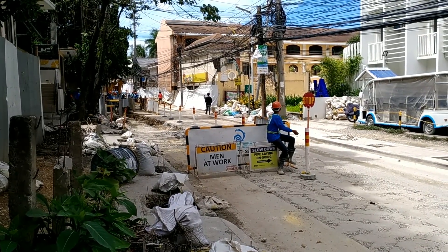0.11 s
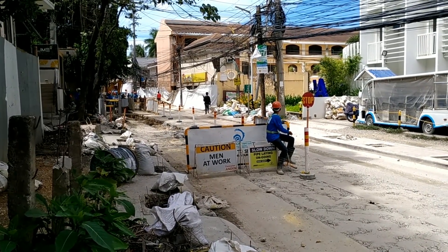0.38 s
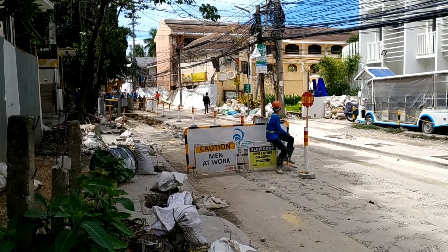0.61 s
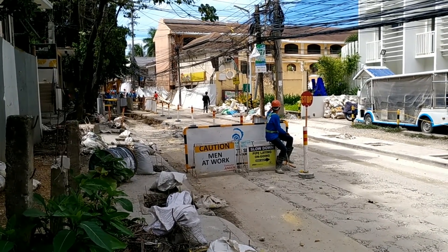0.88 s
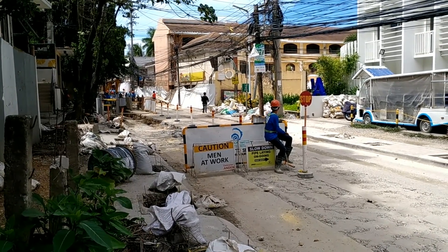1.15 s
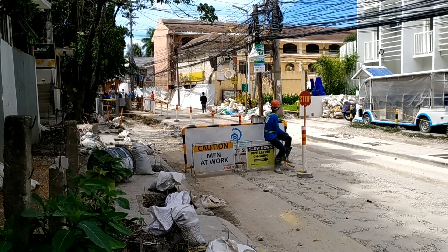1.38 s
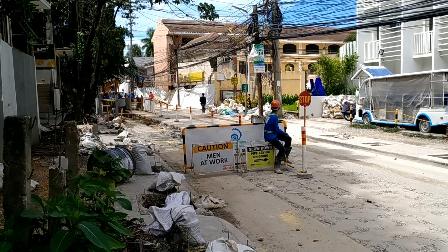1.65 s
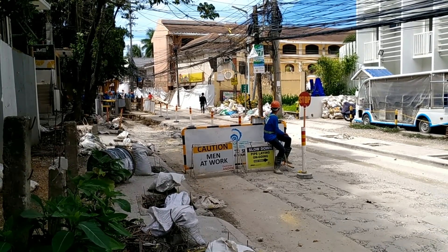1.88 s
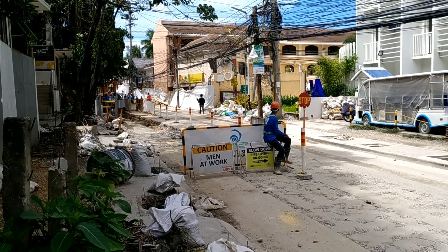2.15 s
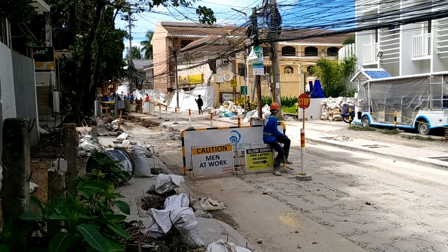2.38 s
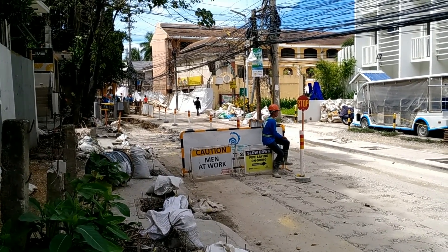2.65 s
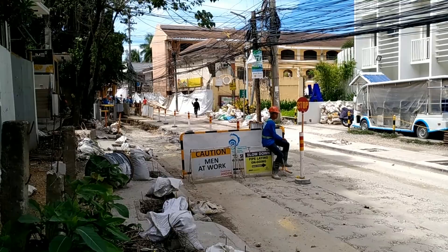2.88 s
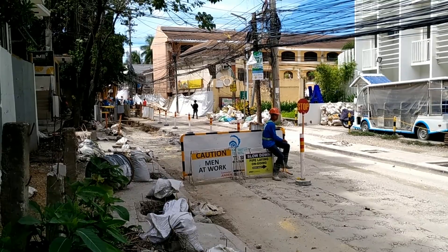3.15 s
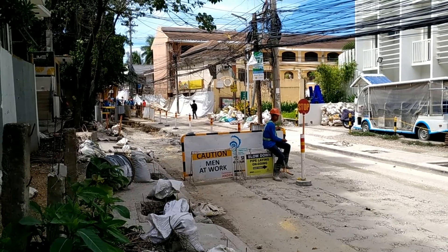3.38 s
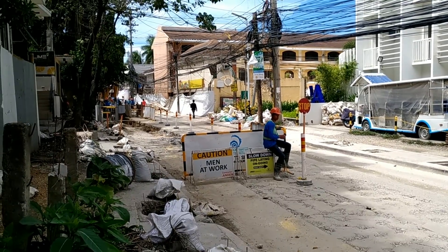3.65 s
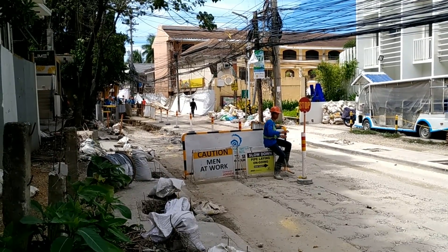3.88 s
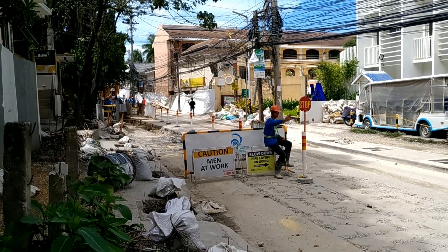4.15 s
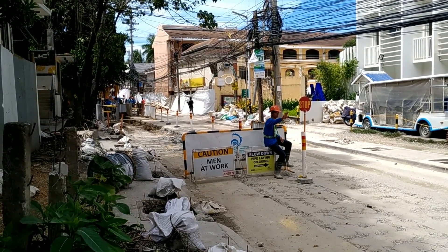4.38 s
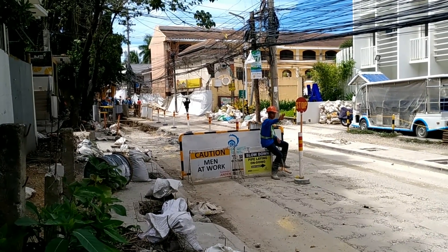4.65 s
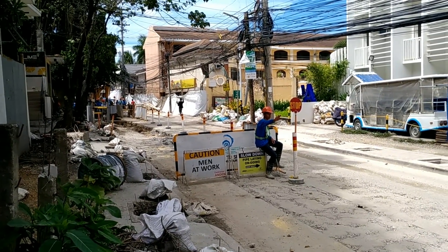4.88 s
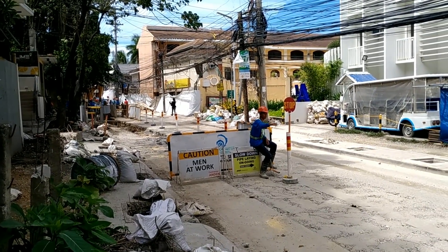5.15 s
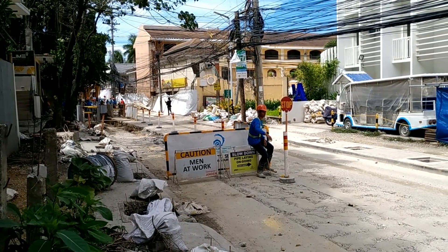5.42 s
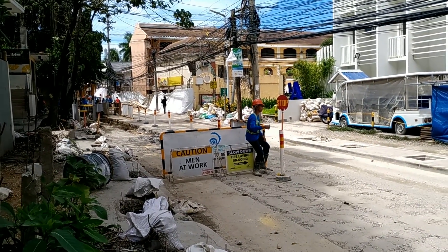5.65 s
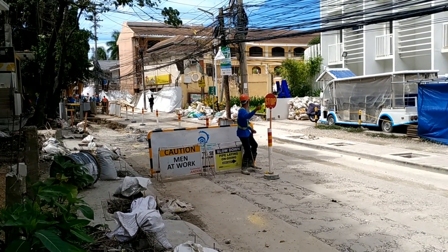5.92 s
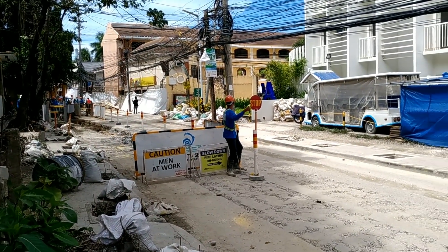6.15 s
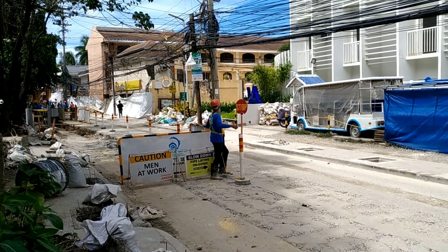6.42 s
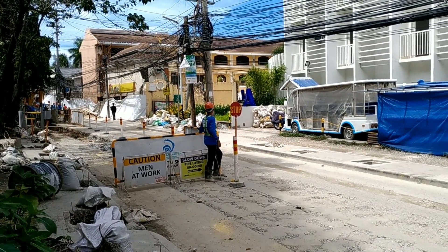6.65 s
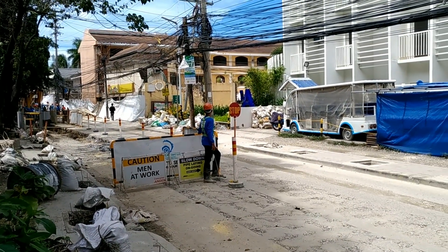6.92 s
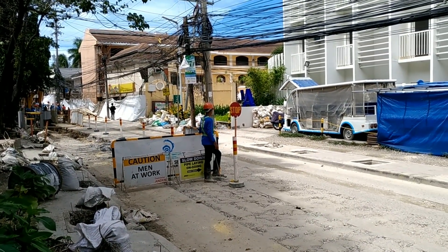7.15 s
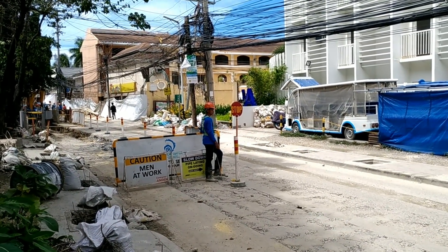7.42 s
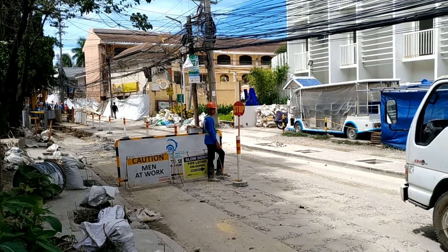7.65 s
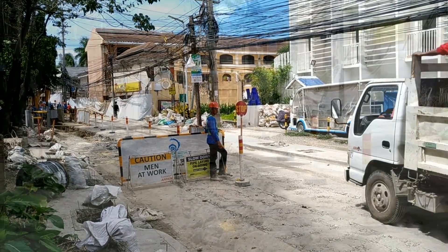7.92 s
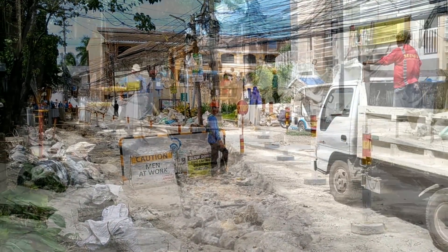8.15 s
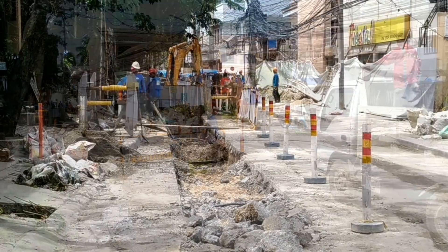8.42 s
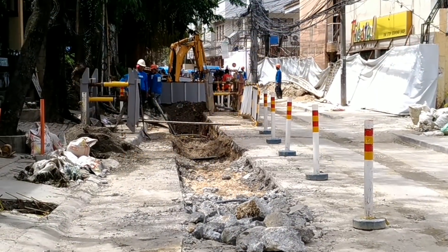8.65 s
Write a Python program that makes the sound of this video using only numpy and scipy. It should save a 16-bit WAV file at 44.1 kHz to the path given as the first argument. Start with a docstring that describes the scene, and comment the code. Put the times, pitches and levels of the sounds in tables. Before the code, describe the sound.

Outdoors beside street works, far engines rumble, a machine drones and tyres wash softly. Thin high squeals, squeaks, air puffs and small metal clinks come and go. A small diesel truck revs up from about four seconds, drops in pitch at a gear change, then clatters past about two metres from a two-port microphone. The sound cuts to silence, and a tiny scrap of street noise with wind thumps ends it.

```python
"""Truck pulling away through street works

Beside a dusty street under repair: far engines rumble, a site machine drones and tyres wash (banded noise).
A small diesel truck revs up, changes gear and rolls by on the right, about two metres from a two-port
microphone: sines at its firing orders, with noise for roar, clatter, block ring and hiss.
Gliding sines squeal, shaped noise puffs air and short decaying sines clink.
The sound drops out; its last tenth of a second is another stretch of the works, truckless, with wind thumps."""
import sys
import numpy as np
from scipy import signal
from scipy.fft import rfft, irfft, next_fast_len
from scipy.io import wavfile
from scipy.ndimage import uniform_filter1d

SR = 44100
rng = np.random.default_rng(int(sys.argv[2]) if len(sys.argv) > 2 else 0)


def generate_wav(signal):
    """Clip the signal to [-1, 1] and save it as 16-bit WAV at the path in sys.argv[1]."""
    frames = np.transpose(np.atleast_2d(signal))
    scaled = np.clip(frames, -1, 1) * 32767
    pcm = np.round(scaled).astype(np.int16)
    wavfile.write(sys.argv[1], SR, pcm)


N = 387638

# truck engine in each gear: (time [s], firing rate [1/s], tone level before the order offsets [dB])
FIRST_GEAR = [(3.7, 28.7, -51.5), (4.3, 37.3, -40), (4.6, 43.7, -38.5), (5.0, 53.3, -37), (5.2, 56, -35),
              (5.5, 63.5, -34.5), (5.75, 68, -36), (5.9, 69, -31.5), (6.0, 65.44, -31.5), (6.2, 58.3, -40),
              (6.4, 49.9, -36.5), (6.55, 40.5, -40), (6.62, 52, -53)]
SECOND_GEAR = [(6.62, 34.14, -47), (6.8, 37.5, -38.5), (7.0, 37.58, -36), (7.2, 40.42, -34.5),
               (7.6, 41.5, -35), (7.8, 43.33, -31), (8.04, 44, -35.5)]
# multiples of the firing rate that sound: (order)
FIRING_ORDERS = 1, 2, 3, 4, 6, 8, 10
# offsets, a row per order: (first gear [dB], second gear [dB], gain at full throttle [dB])
ORDER_OFFSETS = [(-3.3, -2, 4.5), (8.5, 1, -8), (-1.5, 1, 5.5), (-3, -5, -1), (-7.5, -8.5, 9.5),
                 (-8.5, -5, -1.4), (-7, -5, -0.4)]
# colour of the exhaust pipe: (frequency [Hz], gain [dB])
EXHAUST_PIPE = [(28, -27), (42, -4.2), (58, 5.5), (75, 3.5), (100, 5), (117, 0), (131, 5), (155, 0.3),
                (185, 2), (230, -7.5), (300, -4), (400, 2), (600, -1)]
MUFFLER_HZ = 467

# load on the truck: (time [s], exhaust roar level [dB], throttle [0-1])
TRUCK_LOAD = [(3.05, -66.5, .6), (3.45, -46.5, 0.16), (4.34, -35.5, 0.57), (5.0, -28.5, 0.35),
              (5.14, -29, 0.8), (5.42, -27, 1), (5.7, -24.5, 0.77), (5.8, -25, .99), (5.9, -25.5, 0.83),
              (5.98, -23.5, 0.12), (6.3, -27, 0.12), (6.5, -29, .05), (6.65, -32.5, 0.5),
              (6.97, -31.5, 0.61), (7.35, -28.5, 0.71), (7.7, -29.5, 0.72), (7.95, -32.5, 0.91),
              (8.04, -33.5, 0.86)]
# relative noise spectra of the truck: (frequency [Hz], density [dB per Hz])
ROAR_SPECTRUM = [(24, -32), (40, -19), (118, -5.5), (208, 2), (269, -5), (353, -2), (709, -9.5),
                 (997, -8.5), (1200, -17.5), (1560, -48), (2640, -120)]
CLATTER_SPECTRUM = [(500, -28), (800, -9), (1050, -6.5), (1400, 2.5), (1800, -2.5), (2300, -4), (3100, -20),
                    (4500, -26.5), (6000, -52.5)]
CLOSE_SPECTRUM = [(500, -31), (750, -10.5), (1300, 2.5), (1800, 1), (2400, -2), (3000, -9.5), (3600, -14.5),
                  (5500, -15.5), (7500, -25.5)]   # clatter heard straight from the truck
HISS_SPECTRUM = [(1900, -24), (3200, -3), (4600, -6.5), (6000, -9), (8000, -10.5), (10000, -12),
                 (12000, -19.5), (14200, -19.5)]
# against the roar: (level with the throttle shut [dB], gain at full throttle [dB])
CLATTER_DB, RING_DB, HISS_DB = (-12, 13), (-19, 13), (-15.5, 5)
BLOCK_RING_HZ, BLOCK_RING_WIDTH_HZ = 2662, 375
# the truck comes into view and rolls past
IN_VIEW_S, ABREAST_S, ABREAST_DB, ABREAST_M = 6.05, 7.63, -29.5, 2.1
TRUCK_M_PER_S = 5.5
RING_TURN_S, RING_TURN_DB, HISS_TURN_DB = 7.5, 4.5, 1.5   # the block faces us, then the tyres do
SCATTERED_LOSS_DB = 2   # scattered clatter gives way to the direct path once the truck is in view

# thin squeals that hold and squeaks that die away:
# (start [s], length [s], first frequency [Hz], last frequency [Hz], starting level [dB])
SQUEALS = [(0, 0.32, 6590, 6650, -52), (0.32, 0.28, 6620, 6600, -50.5), (0.999, 0.37, 6420, 6580, -56.5),
           (1.425, 0.34, 6600, 6550, -52), (1.78, .4, 6650, 6650, -53.5), (3.6, 0.72, 1003, 1010, -49.5),
           (7.701, 0.29, 10300, 10300, -54)]
SQUEAKS = [(.64, .4, 10255, 10240, -41), (1.49, .08, 8500, 8460, -44), (1.72, .08, 8370, 8300, -52),
           (1.9, .22, 7960, 7900, -53), (3.87, .15, 11230, 11260, -49), (4.1, .7, 10320, 10330, -54)]
SQUEAL_EDGE_S, SQUEAK_FADE_DB = .012, 16.5
SQUEAL_LEFT_DB = -4.5   # left port against right, at the source

# puffs of compressed air: (peak time [s], peak level [dB], fall to 1/e [s], low edge [Hz], high edge [Hz])
PUFFS = [(1.06, -44.5, 0.15, 900, 5100), (2.95, -37, .11, 300, 14200), (4.76, -42, 0.0498, 521, 8800)]
PUFF_RISE_S = 0.027
# soft swells of hiss: (peak time [s], peak level [dB], rise and fall to 1/e [s], low edge [Hz], high edge [Hz])
SWELLS = [(.61, -45.5, 0.063, 9200, 11400), (0.594, -45.5, 0.08, 620, 6200), (0.6, -52, 0.19, 5750, 6350),
          (1.85, -47.5, 0.051, 520, 1900), (7.4, -44.5, 0.18, 5100, 7250), (7.73, -39.5, .04, 5200, 8500),
          (8.0, -43.5, .05, 5000, 8500), (.02, -45, 0.022, 5100, 11000)]

# small metal clinks: (time [s], starting peak [dB], frequency [Hz], time to fall 60 dB [s])
CLINKS = [(1.14, -44, 8240, .08), (1.65, -51, 7000, .06), (1.925, -43, 3700, .07), (6.65, -38, 5500, .1),
          (7.08, -41, 5600, .1), (7.32, -38, 5500, .1), (7.77, -38, 6400, .07), (6.755, -48, 10990, .02)]

# the street swells and sinks: (time [s], level [dB])
STREET_SWELL = [(0, 0), (.5, 0), (.62, 3), (.76, 0.85), (1.55, 1.5), (1.9, 2.5), (2.1, 1.7), (2.88, 0),
                (2.98, 3.5), (3.34, -1), (3.85, 0.6), (4.3, 1.65)]
# relative noise spectra of the street: (frequency [Hz], density [dB per Hz])
RUMBLE_SPECTRUM = [(15, -58.5), (25, -30), (36, -27), (52, -4.5), (80, 0), (120, 1), (160, -5.5),
                   (200, -8.5), (400, -15), (700, -23), (1000, -41)]
DRONE_SPECTRUM = [(170, -28), (220, -5.5), (280, -1), (340, -4), (420, -18.5), (600, -27)]
WASH_SPECTRUM = [(240, -35), (450, -2), (700, -4.5), (1000, -3.5), (1700, -6.5), (2600, -8), (3100, -15.5),
                 (4800, -18.5), (6900, -20), (10000, -25.5), (12000, -33.5), (14200, -42.5)]
# ahead of the drop-out: (level without swell [dB], share of the swell)
RUMBLE_DB, DRONE_DB, WASH_DB = (-33, 0.7), (-40.5, 1.5), (-39, 1)
# on the second stretch: (rumble level [dB], drone level [dB], wash level [dB])
SECOND_STRETCH_DB = -33, -40.5, -36
GUST_DB, GUST_TOP_HZ = [[-26.5], [-35]], 130.2   # left, then right port

# noise common to the two microphone ports: (frequency [Hz], share of power [0-1])
PORT_SHARED = [(60, .94), (170, .96), (350, .92), (520, .8), (700, .63), (1300, .3), (1750, .5),
               (2100, .47), (2600, .27), (3600, .06), (14000, .05)]
# treble balance of the ports: (frequency [Hz], left minus right [dB])
PORT_TILT = [(60, 0.74), (1000, 0), (1700, -0.35), (2600, -2.5), (3100, -3.5), (3800, -2), (4800, -4.5),
             (5900, -8.5), (6500, -9), (7200, -12.5), (8300, -9.5), (10000, 3), (12000, 5), (14200, 17)]
# how far the left port lags: (frequency [Hz], phase [rad])
LEFT_LAG = [(30, 0), (170, .17), (345, .25), (520, .35), (690, .75), (1030, 1.4), (1380, 2.4), (1750, 3.14),
            (2070, 3.5), (2600, 5.1), (14000, 12)]
# silence: (start [s], end [s])
DROP_OUT_S = 8.0455, 8.693


def from_db(db):
    """Decibels to gain."""
    return 10 ** (np.asarray(db) / 20)


def rms_one(x):
    """Scale to unit rms."""
    return x / np.sqrt(np.mean(x ** 2) + 1e-20)


def in_time(rows):
    """Columns of a timed table, drawn as straight lines to every sample."""
    s, *columns = np.transpose(rows)
    t = np.arange(N) / SR
    return [np.interp(t, s, column) for column in columns]


def at_hz(points, hz):
    """A table read on a log-frequency axis."""
    table_hz, values = np.array(points).T
    return np.interp(np.log(hz + 1), np.log(table_hz), values)


def drift(corner_hz):
    """Slow chance of spread 1: noise at every 40th sample through two equal one-pole low-passes."""
    r = np.exp(-80 * np.pi * corner_hz / SR)
    noise = rng.standard_normal(N // 40 + 4002)
    slow = signal.lfilter([1], [1, -2 * r, r * r], noise)[4000:]   # past the filter's start
    return np.interp(np.arange(N) / 40, np.arange(len(slow)), rms_one(slow))


def field(spectrum, slow_db, fast_db, far=1.0):
    """Coloured noise at both ports, flickering in two-thirds-octave bands; a lower far makes them more alike."""
    size = next_fast_len(N)
    hz = np.arange(size // 2 + 1) * SR / size
    both, left, right = rfft(rng.standard_normal((3, size)))
    share = at_hz(PORT_SHARED, hz) ** far
    ports = np.sqrt(share) * both + np.sqrt(1 - share) * np.array([left, right])
    ports *= from_db(at_hz(spectrum, hz))
    together = drift(1.7)   # all bands follow this one
    step = np.log2(hz + 1) * 1.5
    low, high = np.log2([spectrum[0][0], spectrum[-1][0]]) * 1.5
    out = 0
    for centre in np.arange(np.floor(low), high + 1):
        band = np.cos(np.pi / 2 * np.clip(step - centre, -1, 1)) ** 2
        flicker_db = slow_db * together + fast_db * drift(12.0)
        out = out + irfft(ports * band, size)[:, :N] * from_db(flicker_db)
    return rms_one(out)


def truck():
    """Engine tone, roar, clatter and block ring, and hiss; the noises beat with the firings and follow the load."""
    t = np.arange(N) / SR
    roar_db, throttle = in_time(TRUCK_LOAD)
    tone, turns = engine(throttle)
    clatter_db, ring_db, hiss_db = [roar_db + shut_db + gain_db * throttle
                                    for shut_db, gain_db in (CLATTER_DB, RING_DB, HISS_DB)]
    # -1 with the block towards us, +1 with the tyres
    turned = np.tanh((t - RING_TURN_S) / .15) * (t > SECOND_GEAR[0][0])
    ring_db = ring_db - RING_TURN_DB * turned
    hiss_db = hiss_db + HISS_TURN_DB * turned
    clatter_db = clatter_db - SCATTERED_LOSS_DB * in_view()

    beat = np.cos(2 * np.pi * turns)
    roar = from_db(roar_db) * field(ROAR_SPECTRUM, slow_db=-0.44, fast_db=1.23)
    clatter = from_db(clatter_db) * field(CLATTER_SPECTRUM, slow_db=.2, fast_db=.8, far=.55)
    # the direct path comes from one spot, so both ports hear nearly the same noise
    clatter += passing() * field(CLOSE_SPECTRUM, slow_db=.2, fast_db=.8, far=.06)
    ring = from_db(ring_db + 1.7 * drift(9.3)) * block_ring()
    hiss = from_db(hiss_db) * field(HISS_SPECTRUM, slow_db=1.08, fast_db=1.1)
    return tone + roar * (1 + .15 * beat) + (clatter + ring + hiss) * (1 + 0.11 * beat)


def engine(throttle):
    """Firing orders as wavering sines coloured by the exhaust pipe; also the count of firings so far."""
    second = np.arange(N) / SR >= SECOND_GEAR[0][0]
    running = np.arange(N) / SR > FIRST_GEAR[0][0]
    rate, tone_db = np.where(second, in_time(SECOND_GEAR), in_time(FIRST_GEAR))
    turns = np.cumsum(rate * (1 + .002 * drift(8.0))) / SR
    tone = 0
    for order, (first_db, second_db, throttle_db) in zip(FIRING_ORDERS, ORDER_OFFSETS):
        hz = order * rate
        db = tone_db + np.where(second, second_db, first_db) + throttle_db * throttle
        db = db + at_hz(EXHAUST_PIPE, hz) + drift(5.0)
        gain = uniform_filter1d(from_db(db) * running, size=2000)   # softens the start and gear change
        gain = gain / (1 + (hz / MUFFLER_HZ) ** 8)   # the muffler stops the high orders
        tone = tone + np.sqrt(2) * gain * np.sin(2 * np.pi * (order * turns + rng.random()))
    return tone, turns


def in_view():
    """How far the direct path has opened, 0 to 1 over 0.3 s."""
    return np.clip((np.arange(N) / SR - IN_VIEW_S) / .3 + .5, 0, 1)


def passing():
    """Gain of the direct path: one over the distance, once the truck is in view."""
    t = np.arange(N) / SR
    metres = np.hypot(ABREAST_M, TRUCK_M_PER_S * (t - ABREAST_S))
    return from_db(ABREAST_DB) * ABREAST_M / metres * in_view()


def block_ring():
    """Noise twice through one resonance of the engine block, partly common to the ports."""
    r = np.exp(-np.pi * BLOCK_RING_WIDTH_HZ / SR)
    section = [1, 0, -1, 1, -2 * r * np.cos(2 * np.pi * BLOCK_RING_HZ / SR), r * r]
    both, left, right = rng.standard_normal((3, N))
    return rms_one(signal.sosfilt([section, section], .6 * both + np.array([left, right])))


def squeals():
    """Near sines that glide and waver in pitch, their level fluttering differently at each port."""
    out = np.zeros((2, N))
    waver_hz = 20.0 * drift(60.0)
    flutter_db = 3.2 * np.array([drift(30.0), drift(30.0)]) + [[SQUEAL_LEFT_DB], [0]]
    held = [(0, row) for row in SQUEALS]
    dying = [(SQUEAK_FADE_DB, row) for row in SQUEAKS]
    for fade_db, (s, length, first_hz, last_hz, start_db) in held + dying:
        near = slice(round(max(s, 0) * SR), round((s + length) * SR))
        along = np.linspace(0, 1, near.stop - near.start)
        hz = first_hz + (last_hz - first_hz) * along + waver_hz[near]
        edges = np.clip(np.minimum(along, 1 - along) * length / SQUEAL_EDGE_S, 0, 1)
        gain = edges * from_db(start_db - fade_db * along + flutter_db[:, near])
        out[:, near] += np.sqrt(2) * gain * np.sin(2 * np.pi * np.cumsum(hz) / SR)
    return out


def puffs():
    """Each puff or swell is band-passed noise, tilted towards the low end, that rises and dies away."""
    t, out = np.arange(N) / SR, np.zeros((2, N))
    air = signal.lfilter([1], [1, -.8], rng.standard_normal((2, N)))
    sharp = [(PUFF_RISE_S, row) for row in PUFFS]
    soft = [(row[2], row) for row in SWELLS]   # they rise as slowly as they fall
    for rise, (s, db, fall, low_hz, high_hz) in sharp + soft:
        near = slice(round(max(s - .4, 0) * SR), round((s + .6) * SR))
        band = signal.butter(2, [low_hz, high_hz], "band", fs=SR, output="sos")
        jet = rms_one(signal.sosfilt(band, air[:, near]))
        since = t[near] - s
        envelope = np.exp(-(since / np.where(since < 0, rise, fall)) ** 2)
        out[:, near] += from_db(db) * jet * envelope
    return out


def clinks():
    """Each clink is one short sine, dying exponentially as struck metal does."""
    out, t = np.zeros(N), np.arange(SR // 10) / SR
    for s, db, hz, t60 in CLINKS:
        at = round(s * SR)
        onset = np.minimum(t / .001, 1)
        out[at:at + len(t)] += from_db(db - 60 * t / t60) * np.sin(2 * np.pi * hz * t) * onset
    return out


def street():
    """Far engines rumble in lumps, a site machine drones, tyres wash more smoothly above: all noise."""
    later = np.arange(N) / SR > DROP_OUT_S[0]
    (swell_db,) = in_time(STREET_SWELL)
    levels = zip(SECOND_STRETCH_DB, (RUMBLE_DB, DRONE_DB, WASH_DB))
    rumble_db, drone_db, wash_db = [np.where(later, later_db, db + share * swell_db)
                                    for later_db, (db, share) in levels]
    rumble = from_db(rumble_db) * field(RUMBLE_SPECTRUM, slow_db=1.26, fast_db=1.5)
    drone = from_db(drone_db) * field(DRONE_SPECTRUM, slow_db=1.0, fast_db=2.9)
    wash = from_db(wash_db) * field(WASH_SPECTRUM, slow_db=-0.14, fast_db=1.32)
    return rumble + drone + wash


def gust():
    """On the second stretch wind thumps low on the ports, more on the left: low band-passed noise."""
    band = signal.butter(2, [45, GUST_TOP_HZ], "band", fs=SR, output="sos")
    low = signal.sosfilt(band, rng.standard_normal((2, N)))
    return from_db(GUST_DB) * rms_one(low) * (np.arange(N) / SR > DROP_OUT_S[0])


def scene():
    """All sources as they reach the two ports; the truck is gone on the second stretch."""
    first_stretch = np.arange(N) / SR < DROP_OUT_S[1]
    return truck() * first_stretch + squeals() + puffs() + clinks() + street() + gust()


def band_limit(x):
    """A steep low-pass at the top of the band."""
    return signal.sosfilt(signal.butter(12, 14260, fs=SR, output="sos"), x)


def record(dry):
    """Two-port microphone: the left port lags, the right has its own treble colour; the sound drops out."""
    size = next_fast_len(N)
    hz = np.arange(size // 2 + 1) * SR / size
    left = np.exp(-1j * at_hz(LEFT_LAG, hz))
    right = from_db(-at_hz(PORT_TILT, hz))
    mix = irfft(rfft(dry, size) * np.array([left, right]), size)[:, :N]
    t = np.arange(N) / SR
    mix = mix * ((t < DROP_OUT_S[0]) | (t > DROP_OUT_S[1]))
    return band_limit(mix)


dry = scene()
out = record(dry)
generate_wav(out)
```